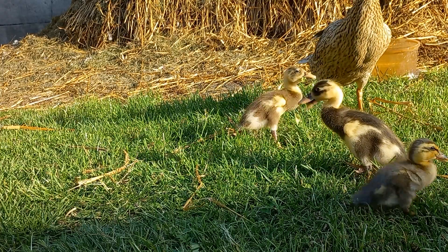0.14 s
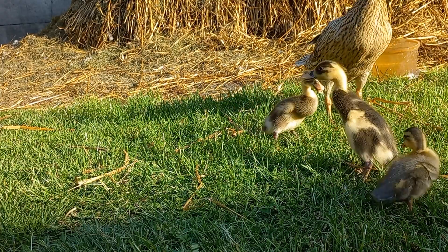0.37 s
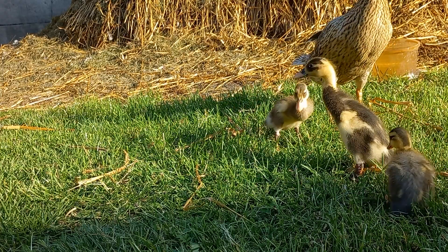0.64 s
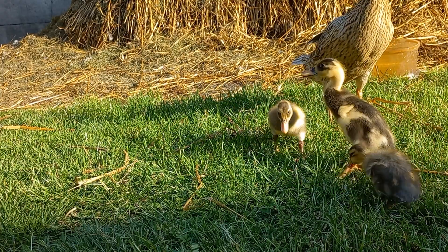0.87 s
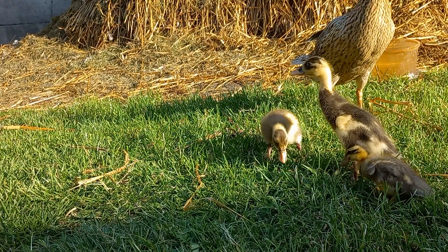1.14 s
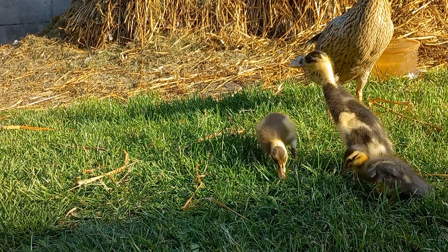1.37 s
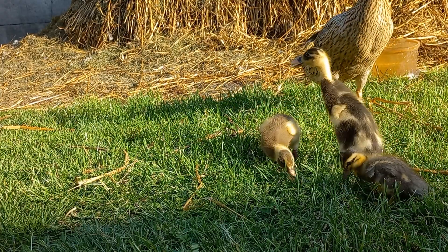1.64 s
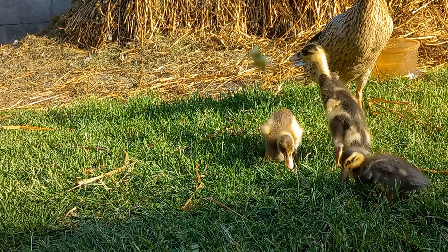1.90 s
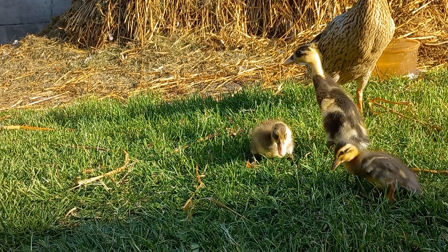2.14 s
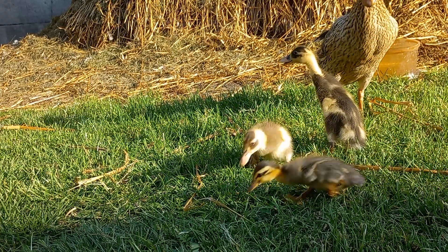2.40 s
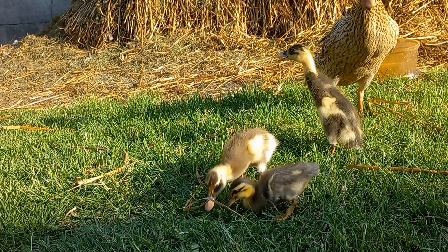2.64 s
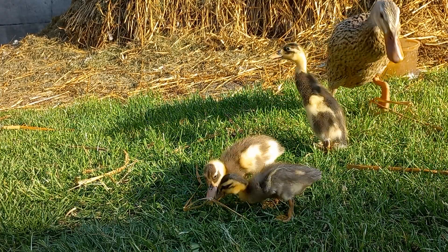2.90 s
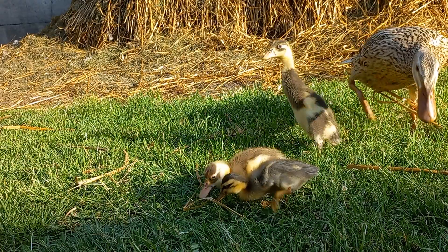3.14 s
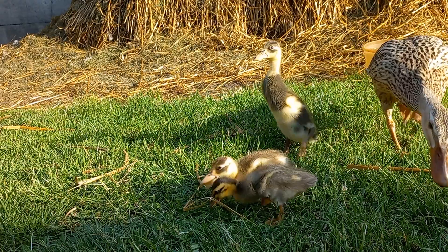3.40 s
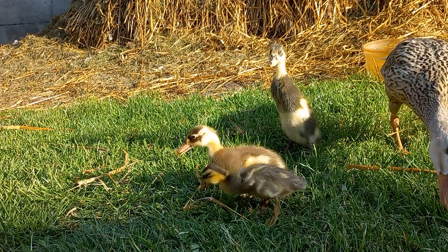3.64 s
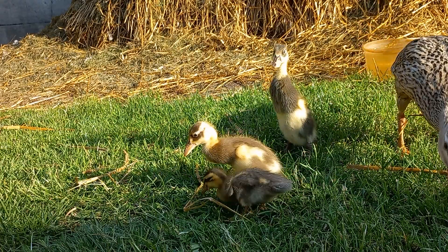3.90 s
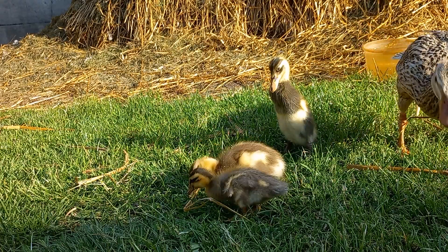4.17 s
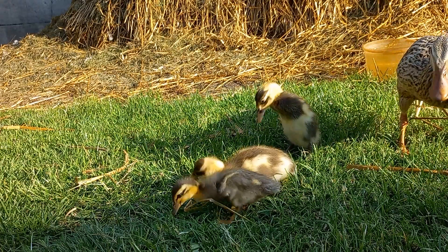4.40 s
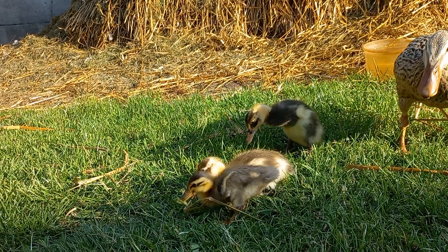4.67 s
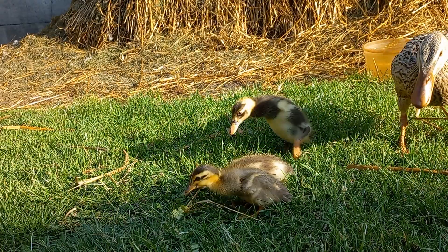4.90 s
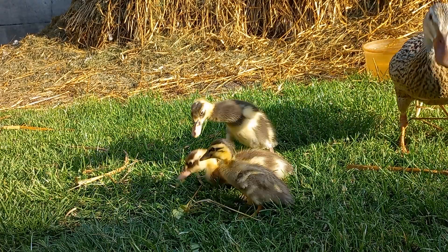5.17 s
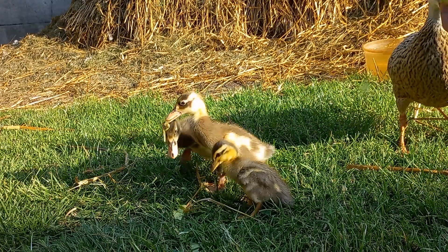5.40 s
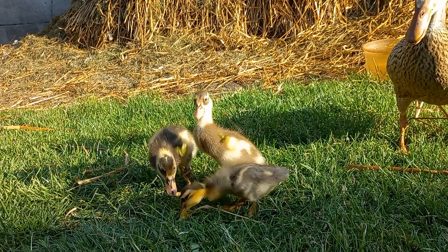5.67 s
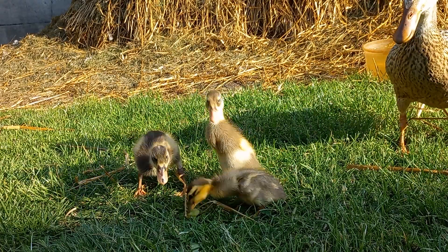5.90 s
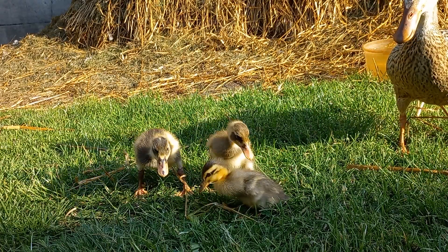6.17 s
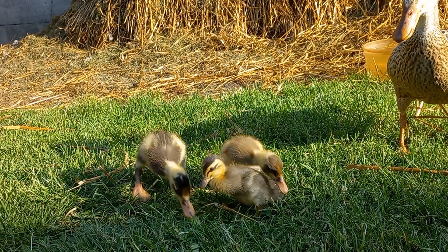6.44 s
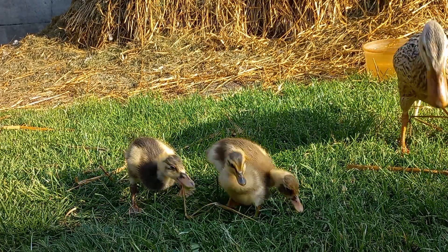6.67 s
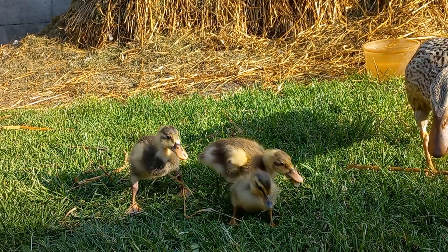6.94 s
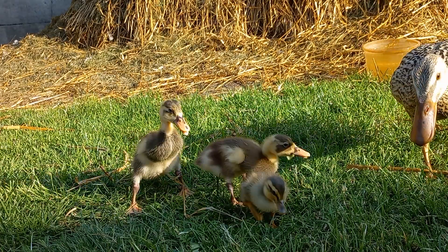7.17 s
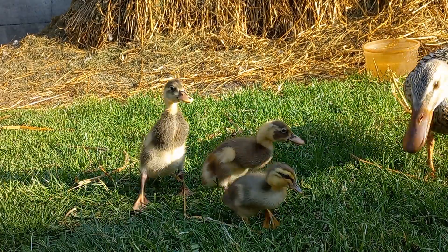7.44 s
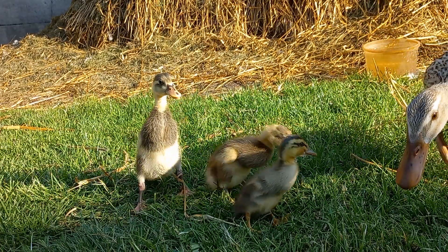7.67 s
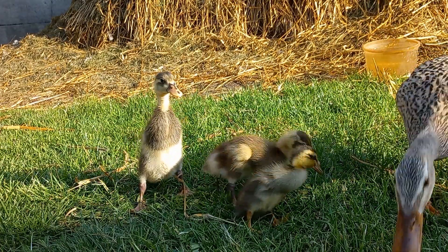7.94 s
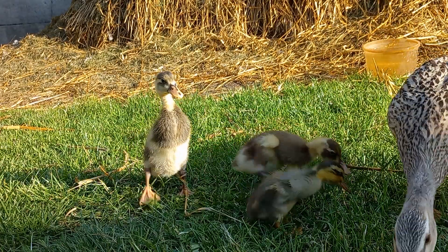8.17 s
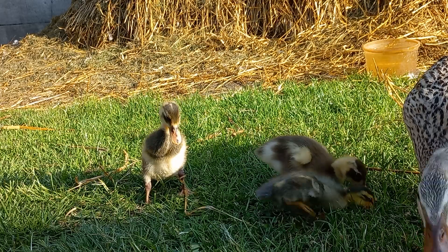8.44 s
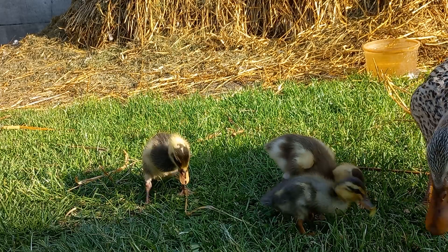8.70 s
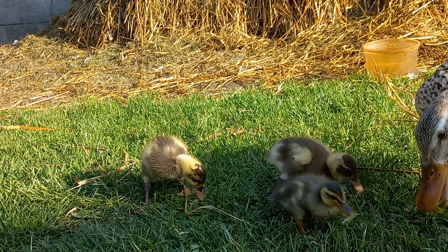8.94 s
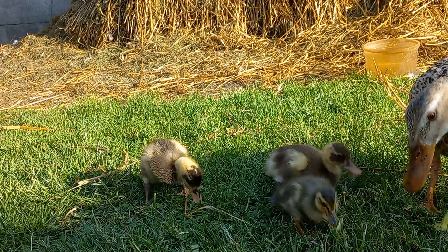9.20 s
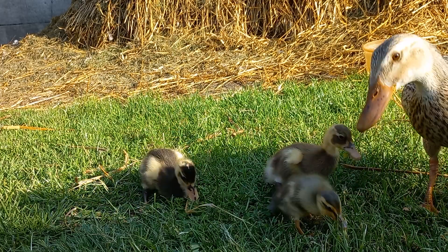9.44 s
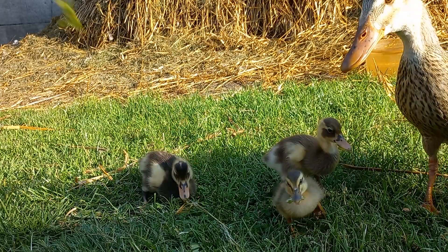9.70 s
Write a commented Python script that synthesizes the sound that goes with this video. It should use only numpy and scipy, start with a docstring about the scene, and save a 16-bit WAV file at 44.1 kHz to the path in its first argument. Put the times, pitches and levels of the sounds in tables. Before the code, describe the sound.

Outdoors on grass, a hen duck quacks sharply and clucks softly, ducklings peep thinly, faint birds whistle far away and low wind bumps the microphone.

```python
"""Duck and ducklings on a lawn

A mother duck gives five loud quacks and many soft clucks: quacks are beats ringing in a throat, clucks two
voices with sum and difference tones. Ducklings peep as arched sines and rustle the grass, a noise crackle.
Far birds whistle as gliding sines; a straw stack and fences answer with decaying noise echoes.
Light wind rumbles and bumps, mostly at one microphone port at a time, over a distant noise wash."""
import sys
import numpy as np
from scipy import signal
from scipy.fft import rfft, irfft, next_fast_len
from scipy.io import wavfile
from scipy.ndimage import uniform_filter1d, map_coordinates

SR = 44100
rng = np.random.default_rng(int(sys.argv[2]) if len(sys.argv) > 2 else 0)


def transcribe(u):
    """Save the signal u as a 16-bit wav file named by the first command-line argument.

    u: samples, shape (n,) or (channels, n), limited to [-1, 1]; the rate is SR.
    q: integer samples, one column per channel.
    """
    v = np.clip(np.atleast_2d(u).T, -1, 1)
    q = np.round(v * 32767).astype(np.int16)
    wavfile.write(sys.argv[1], SR, q)


def volts_from_decibels(level):
    """Turn decibel levels (scalar or array-like) into linear amplitude factors."""
    exponent = np.asarray(level, float) / 20
    return 10 ** exponent


N = 433062

# three chest modes, then three upper windpipe modes: centre_hz, width_hz, relative_db
PIPE_MODES = [(204, 82, -1), (460.3, 330, -9.5), (930, 46, -5.5), (3720, 632, -15.5), (5480, 790, -21),
              (7230, 370, -29.5)]
# mouth modes of a softer, half-shut bill: ratio to mouth resonance, width_hz, relative_db
HALF_SHUT_MODES = [(0.999, 236, 2.5), (1.602, 347, -7), (2.1, 300, -6)]
CREAK_S = 0.009  # span of the slow beats in a pop; the voice follows


def unit(x):
    """Scales to rms 1."""
    return x / np.sqrt(np.mean(x ** 2) + 1e-20)


def along(points, hz):
    """Interpolates (Hz, value) points on a log frequency axis."""
    f, v = np.transpose(points)
    return np.interp(np.log(hz + 1), np.log(f + 1), v)


def wobble(rate, size=N):
    """A smooth random curve, rate knots a second."""
    knots = rng.standard_normal(int(size * rate / SR) + 4)
    return map_coordinates(knots, [np.arange(size) * rate / SR])


def filtered(x, response):
    """Multiplies the spectrum by a complex response of frequency."""
    m = next_fast_len(N + SR // 4)
    return irfft(rfft(x, m) * response(np.fft.rfftfreq(m, 1 / SR)), m)[..., :N]


def hiss(spectrum, alike):
    """Stereo noise of rms 1; alike = power share common to both ports."""
    common, left, right = rng.standard_normal((3, N))
    alike = np.clip(alike, 0, 1)
    pair = np.sqrt(alike) * common + np.sqrt(1 - alike) * np.array([left, right])
    return unit(filtered(pair, lambda hz: volts_from_decibels(along(spectrum, hz))))


def add(track, s, sound):
    """Mixes a sound in at s seconds."""
    part = track[..., round(s * SR):][..., :sound.shape[-1]]
    part += sound[..., :part.shape[-1]]


def air():
    """Distant wash of fields and traffic, shaped noise, with two faint drones of band noise."""
    # wash spectrum: freq_hz, relative density_db
    wash = [(30, -57.5), (59, -21.5), (100, -10), (219, -12), (854, -25.5), (1200, -29), (1910, -23.5),
            (3500, -36), (7000, -31), (16000, -39.5)]
    # drones: centre_hz, half_width_hz, level_db
    drones = [(220, 210, -73.5), (1600, 18, -92.5)]
    sway_db = 0.9 * wobble(1.2) + 1.5 * wobble(7)
    out = volts_from_decibels(-71 + sway_db) * hiss(wash, alike=0.25)
    for hz, half_width_hz, db in drones:
        band = lambda f: 1 / (1 + ((f - hz) / half_width_hz) ** 2)
        tone = unit(filtered(rng.standard_normal(N), band))
        out += volts_from_decibels(db + 2 * wobble(5)) * tone
    return out


def wind():
    """Low noise rumble with lumps on each port, and bumps that strike mostly one port."""
    # rumble strength: time_s, level_db
    strength = [(0.0, -78.5), (3.06, -80), (3.47, -59), (4.07, -74.5), (4.38, -63), (5.47, -71),
                (7.109, -82), (7.3, -61.5), (8.78, -65.5), (9.82, -72.5)]
    # bumps: time_s, peak_db, left_minus_right_db
    bumps = [(0.775, -52.5, 30), (3.307, -49, -24), (3.577, -52, -31), (4.136, -44.5, -41),
             (4.45, -56.5, -30), (7.132, -40, -33), (7.352, -41.5, -8), (8.18, -45.5, -46),
             (8.697, -44.5, -7.5), (8.894, -46.5, -41.5)]
    # rumble spectrum: freq_hz, relative density_db
    gust = [(30, -57.5), (48, -26.5), (80, -1.5), (120, -11), (200, -15.5), (400, -55)]
    rumble_db = np.interp(np.arange(N) / SR, *np.transpose(strength))
    lumps = volts_from_decibels(rumble_db + 5.6 * np.array([wobble(12.0), wobble(34.0)]))
    t = np.arange(SR // 5) / SR
    for s, db, pan_db in bumps:
        side = volts_from_decibels(np.minimum([[pan_db], [-pan_db]], 0))
        bump = volts_from_decibels(db - 60 * t / 0.5) * (1 - np.exp(-t / 0.0041))
        add(lumps, s - 0.01, side * bump)
    return lumps * hiss(gust, alike=0.4)


def yard(x, gap_s):
    """Scattered answers of stack and fences, reshuffled by moving air; each frequency dies at its own speed."""
    # decay: freq_hz, t60_s
    decay = [(200, 0.27), (1500, 0.19), (4500, 0.16), (12000, 0.038)]
    out = 0
    drift = np.exp(3 * np.array([wobble(45) for _ in range(3)]))
    for share in np.sqrt(drift / drift.sum(0)):
        hz, t, z = signal.stft(rng.standard_normal((2, SR // 2)), SR, nperseg=256)
        fall = volts_from_decibels(-60 * t / along(decay, hz)[:, None])
        tail = signal.istft(z * fall, SR, nperseg=256)[1]
        late = np.pad(x * share, (round(gap_s * SR), 0))[None]
        out = out + signal.fftconvolve(late, tail / np.linalg.norm(tail[0]), axes=1)[:, :N]
    return out


def whistle(length_s, swoop_s, from_hz, to_hz, db, loss_db, flutter_db):
    """A gliding sine whose strength flutters on the way through the air."""
    t = np.arange(0, length_s, 1 / SR)
    flutter = wobble(60, size=SR)[:len(t)]
    level = volts_from_decibels(db - loss_db * t / length_s + flutter_db * flutter)
    level = signal.windows.tukey(len(t), 0.35) * level
    hz = to_hz + (from_hz - to_hz) * np.clip(1 - t / swoop_s, 0, 1) ** 0.92
    return level * np.sin(2 * np.pi * np.cumsum(hz) / SR)


def far_birds():
    """Whistles that glide onto a held note and one low falling moan from beyond the lawn."""
    # whistles: start_s, length_s, swoop_s, from_hz, held_hz, source level_db
    whistles = [(0.105, 0.081, 0.0186, 2180, 2450, -60), (1.028, 0.082, 0.041, 2927, 1896, -72),
                (1.095, 0.051, 0.023, 1870, 2295, -69), (4.041, 0.091, 0.081, 2560, 1620, -59),
                (4.069, 0.092, 0.024, 3256, 2240, -60.5), (4.351, 0.151, 0.047, 2660, 2075, -67.5),
                (4.654, 0.144, 0.016, 3150, 2448, -53.5), (5.3, 0.096, 0.067, 1838, 1660, -69),
                (5.793, 0.11, 0.036, 3170, 2704, -64.5), (6.818, 0.11, 0.044, 3215, 2000, -68)]
    out = np.zeros(N)
    for s, *row in whistles:
        add(out, s, whistle(*row, loss_db=12, flutter_db=2.5))
    moan = whistle(0.5, 0.5, from_hz=540, to_hz=440, db=-70, loss_db=0, flutter_db=2.5)
    add(out, 8.15, moan)
    return out


def grass():
    """Feet and bills stir dry stalks: swells of fine noise crackle plus single snaps and faint ticks."""
    # stirrings: centre_s, half_length_s, level_db
    stirrings = [(0.984, 0.091, -64), (2.989, 0.053, -56.5), (3.577, 0.21, -65.5), (4.53, 0.1, -60),
                 (8.08, 0.058, -67.5)]
    # snaps: time_s, peak_db
    snaps = [(0.9741, -42), (1.2954, -52.5), (4.4597, -43.5), (4.498, -56.5), (4.5301, -35.5), (4.571, -33)]
    # stalk spectrum: freq_hz, relative density_db
    stalks = [(3000, -28), (5000, -9), (8000, -5), (16000, 0)]
    ticks_per_s = 9
    crackle = unit(volts_from_decibels(5 * np.abs(wobble(400))) * hiss(stalks, alike=0.1))
    time_s = np.arange(N) / SR
    swell = sum(volts_from_decibels(db) * np.exp(-((time_s - s) / half) ** 2) for s, half, db in stirrings)
    blows, t = np.zeros(N), np.arange(600) / SR
    # random times, -72 to -58 dB
    ticks = rng.random((round(ticks_per_s * N / SR), 2)) * [N / SR, 14] - [0, 72]
    for s, db in [*snaps, *ticks]:
        add(blows, s, volts_from_decibels(db - 60 * t / 0.0042) * np.clip(t * 3000, 0, 1))
    return swell * volts_from_decibels(3.0 * wobble(50)) * crackle + blows * hiss(stalks, alike=0.092)


def ducklings():
    """Each peep is a short sine that arches up and down, with an overtone, weak in most."""
    # peeps: centre_s, top_hz, level_db
    peeps = [(2.432, 2950, -53.5), (2.566, 2370, -61.5), (3.075, 3060, -60), (3.592, 1970, -54),
             (3.62, 3090, -62), (3.758, 2393, -49.5), (3.898, 2948, -55), (4.149, 2140, -50.5),
             (4.315, 2505, -47), (4.522, 2540, -58), (5.86, 2200, -61), (5.966, 2410, -55.5),
             (6.47, 2216, -57), (6.9, 2420, -62), (6.952, 2540, -63.5), (7.138, 2800, -61.5),
             (7.707, 2800, -47), (7.96, 2990, -44.5), (8.127, 3430, -49), (8.345, 2150, -56),
             (8.487, 2580, -63), (8.51, 2060, -58)]
    strong_overtone_s = [3.075, 3.62, 7.136]
    out, u = np.zeros(N), np.linspace(-1, 1, 2300)
    for s, hz, db in peeps:
        phase = 2 * np.pi * np.cumsum(hz * (1 - 0.36 * u ** 2)) / SR
        strong = np.isclose(s, strong_overtone_s, atol=0.01).any()
        over_db = -5 if strong else -24.5
        tone = np.sin(phase) + volts_from_decibels(over_db) * np.sin(2 * phase)
        add(out, s - len(u) / 2 / SR, volts_from_decibels(db - 20 * u ** 2) * (1 - u ** 8) * tone)
    return out


def mode(f, c, w, db):
    """One causal resonance: centre c and width w in Hz."""
    return volts_from_decibels(db) * 1j * f * w / (c * c - f * f + 1j * f * w)


def throat(f, mouth_hz, modes, bill_hz, nasal_db, chest_db):
    """Mouth modes, upper band and chest; the bill darkens both sides of the mouth band."""
    nasal_hz, nasal_width_hz = 2100, 300
    out = sum((-1) ** k * mode(f, mouth_hz * r, w, g) for k, (r, w, g) in enumerate(modes))
    out = out * mode(f, mouth_hz * 1.042, bill_hz, 0)
    out = out + mode(f, nasal_hz, nasal_width_hz, nasal_db / 2) ** 2
    out = out / (1 + 1j * f / 2600 * 1.14 - (f / 2600) ** 2) ** 3
    chest = sum((-1) ** k * mode(f, c, w, g + chest_db) for k, (c, w, g) in enumerate(PIPE_MODES[:3]))
    return out + chest / (1 + 1j * f / 1500) ** 2


def windpipe(f):
    """The upper resonances, high-passed."""
    upper = sum((-1) ** k * mode(f, *row) for k, row in enumerate(PIPE_MODES[3:]))
    return upper * (1j * f / (3000 + 1j * f)) ** 4


def call(s, db, pitch_hz, mouth_hz, modes, bill_hz, half_beat, chest_db, jitter, scatter_db, nasal_db,
         breath_db):
    """Membrane beats, each ringing through the throat as it is shaped at that moment."""
    # beats where the voice catches: time_s, change_db
    catches = [(.394, -16), (.417, -16), (1.527, -8), (1.557, -9), (2.011, -12)]
    size = 10240
    t = np.arange(s[0], s[-1], 1 / SR)
    smooth_hz = uniform_filter1d(np.interp(t, s, pitch_hz), size=400)
    turns = np.cumsum(smooth_hz) / SR
    beat = np.arange(0, turns[-1], 0.5)
    chance = rng.standard_normal((len(beat), 3))
    when = np.interp(beat, turns, t)
    rate, effort_db = np.interp(when, s, pitch_hz), np.interp(when, s, db)
    half = np.interp(when, s, half_beat)
    catch_db = sum(d * np.exp(-((when - c) * rate * 1.5) ** 4) for c, d in catches)
    strength = volts_from_decibels(effort_db + catch_db + scatter_db * chance[:, 0])
    strength *= np.sqrt(SR / rate / (1 + half ** 2))
    strength[1::2] *= half[1::2]  # a weaker beat halfway through the cycle strengthens the even overtones

    f = np.fft.rfftfreq(size, 1 / SR)
    mouth = np.interp(when, s, mouth_hz)[:, None] * (1 + 0.012 * chance[:, 2:])
    nasal, chest = np.interp(when, s, nasal_db)[:, None], np.interp(when, s, chest_db)[:, None]
    ring = throat(f, mouth, modes, bill_hz, nasal, chest)
    ring /= np.sqrt(np.mean(np.abs(ring) ** 2, 1, keepdims=True))
    # harder beats are brighter
    treble = windpipe(f) / (1 + 1j * f / 9000) ** (effort_db[:, None] / -24) ** 2
    # each beat lets out a short hiss, strongest through the upper resonances
    puff = volts_from_decibels(breath_db - 60 * np.arange(400) / SR / 0.008) * rng.standard_normal((len(beat), 400))
    puff = rfft(puff, size)
    ring *= 1 + 0.09 * (f / 1500) ** 1.5 * puff / np.abs(puff).mean()  # upper overtones break up first
    treble_gain = volts_from_decibels(13.5 + 0.32 * (effort_db - effort_db.max()))[:, None]
    ring += treble_gain * treble * (1 + puff)
    delay_s = when - s[0] + 0.0024 + np.interp(when, s, jitter) * chance[:, 1] / rate
    delay = np.exp(-2j * np.pi * f * delay_s[:, None])
    return -irfft(np.sum(strength[:, None] * ring * delay, 0), size)


def pop(s0, db):
    """The shut bill opens on slow beats at 210 Hz."""
    same = np.ones(2)
    return call(s0 + np.array([0, CREAK_S]), [db, db - 7.5], 210 * same, 600 * same, HALF_SHUT_MODES,
                bill_hz=496, half_beat=0 * same, chest_db=8 * same, jitter=0 * same, scatter_db=0.51,
                nasal_db=-40 * same, breath_db=-16.5)


def cluck(s, db, low_hz, high_hz, high_db, mouth_hz):
    """Two membranes share one airstream: overtones mix into sum and difference tones, richer toward the end."""
    waver = 0.016  # pitch wander as a share
    soft_db, hard_db = -1.5, 2  # loss per overtone step, opening and end
    mix_db = 13, 1  # further loss of mixed tones, opening and end
    t = np.arange(s[0], s[-1], 1 / SR)
    u = (t - s[0]) / (s[-1] - s[0])
    hz = np.array([uniform_filter1d(np.interp(t, s, v), size=400) * (1 + waver * wobble(90, size=len(t)))
                   for v in (low_hz, high_hz)])
    orders = np.array([(m, n) for m in range(7) for n in range(-3, 5) if (m, n) > (0, 0)])
    f, phase = orders @ hz, 2 * np.pi * orders @ np.cumsum(hz, 1) / SR
    steps = np.abs(orders).sum(1)[:, None] - 1
    size = volts_from_decibels(high_db * (orders[:, 1:] != 0) - steps * (soft_db + (hard_db - soft_db) * u))
    size[orders.prod(1) != 0] *= volts_from_decibels(-np.interp(u, [0, 1], mix_db))

    closing_hz = mouth_hz * (hz[0] / hz[0].max()) ** 0.67
    nasal_db = 20 * np.log2(mouth_hz / 1400)  # a wider bill lets out more of the upper band
    ring = throat(np.abs(f), closing_hz, HALF_SHUT_MODES, 2300, nasal_db - 60 * (u - 0.65) ** 2,
                  -8 + 19 * u ** 2)
    size = size * (ring + volts_from_decibels(7.5) * windpipe(np.abs(f)))
    voice = np.real(size * np.exp(1j * np.sign(f) * phase)).sum(0)
    voice = voice / np.sqrt(np.sum(np.abs(size) ** 2, 0) / 2)
    breath = rfft(rng.standard_normal(len(t)) * np.abs(voice) * u)  # air escapes in step with the beats
    breath = irfft(breath * windpipe(np.fft.rfftfreq(len(t), 1 / SR)), len(t))
    voice = voice + volts_from_decibels(-23) * unit(breath)
    return voice * volts_from_decibels(np.interp(t, s, db)) * signal.windows.tukey(len(t), 0.14)


def clucks():
    """Soft clucks: a bill pop, then two voices that swell to a crest and sink in pitch."""
    # clucks: start_s, length_s, peak_db, low_top_hz, low_last_hz, high_top_hz, high_last_hz,
    # high_over_low_db, mouth_resonance_hz
    short_clucks = [(2.44, .079, -54, 716, 589, 1100, 879, -17.5, 1024),
                    (2.647, 0.079, -43, 830, 600, 1290, 900, 2.5, 1400),
                    (2.929, .097, -40.5, 902, 630.7, 1475, 950, 0, 1226),
                    (3.228, 0.089, -40, 862.7, 622.7, 1400, 796.5, -2, 950),
                    (3.444, 0.094, -32.5, 850, 723.5, 1320, 750.6, -2.5, 862),
                    (4.212, .09, -47.5, 849.4, 536, 1501, 830, -7, 824),
                    (4.722, 0.074, -45.5, 896.5, 748.3, 1324, 1130, -37, 1530),
                    (6.178, 0.066, -51.5, 810, 585, 1220, 891, -7.5, 1240),
                    (6.374, .069, -37, 823.7, 586.4, 1284, 843.7, 6, 1440),
                    (7.206, 0.056, -45, 761, 696, 1164, 1046, -16.5, 740),
                    (7.627, .091, -44.5, 886.3, 589.6, 1454, 930, -7.5, 1025),
                    (7.846, .09, -37, 884.4, 728.5, 1583, 680.7, -6, 1240),
                    (7.989, .06, -48.5, 956, 760, 1256, 1123, 2, 855),
                    (8.968, 0.083, -42.5, 907, 574, 1405, 887, -11, 893),
                    (9.274, .095, -44, 923.4, 600, 1502, 1031, -10, 1460)]
    # one drawn-out cluck that dips and ends on a yelp: time_s, level_db, low_voice_hz, high_voice_hz
    long_cluck = [(8.652, -45, 760.7, 1181), (8.667, -48.5, 900, 1388), (8.686, -44, 700, 1000),
                  (8.716, -42.5, 715, 965), (8.763, -35.5, 755, 1020), (8.776, -40.5, 786.4, 1139),
                  (8.788, -27, 653.5, 959.3), (8.8, -51, 563, 780)]
    voiced_s = 0.03  # pop to top pitch
    swell_db, fade_db, crest_share = 8, 2.5, 0.56
    low_sag_power, high_sag_power = 1.7, 1.6  # higher sinks later
    out, u = np.zeros(N), np.linspace(0, 1, 11)
    for s0, length, peak_db, low_hz, low_last_hz, high_hz, high_last_hz, high_db, mouth_hz in short_clucks:
        s = s0 + np.r_[CREAK_S, voiced_s + (length - voiced_s) * u]
        rise_db = np.interp(u, [0, crest_share, 1], [-swell_db, 0, -fade_db])
        db = peak_db + np.r_[-2 * swell_db, rise_db]
        low = np.r_[0.75 * low_hz, low_hz + (low_last_hz - low_hz) * u ** low_sag_power]
        high = np.r_[0.85 * high_hz, high_hz + (high_last_hz - high_hz) * u ** high_sag_power]
        add(out, s0 - 0.002, pop(s0, -47 + 0.64 * (peak_db + 42)))  # the pop partly follows the level
        add(out, s[0], cluck(s, db, low, high, high_db, mouth_hz))
    add(out, 8.638 - 0.002, pop(8.638, -42))
    add(out, long_cluck[0][0], cluck(*np.transpose(long_cluck), high_db=1.5, mouth_hz=950))
    return out


def quacks():
    """Loud quacks with the bill wide: the pitch lifts partway, the beats roughen, the pitch sinks back."""
    # quacks: start_s, length_s, peak_db, opening_hz, highest_hz, lift_share_of_length, lift_s,
    # mouth_resonance_hz, level_change_at_lift_db, chest_db
    loud_quacks = [(0.371, 0.12, -22.5, 175.3, 210.3, .4, 0.018, 1269, 1, -6.5),
                   (1.510, 0.1, -24.5, 177.1, 220, .3, .02, 1274, 3, -7),
                   (1.985, 0.11, -18, 203.9, 249.4, 0.42, 0.029, 1331, 2.5, -10),
                   (5.639, 0.0955, -17.5, 224.7, 246.3, 0.36, .02, 1373, -0.5, -6),
                   (7.265, 0.11, -18, 220.3, 314.4, .5, 0.01, 1486, -3, 0)]
    # wide-open mouth modes: ratio to mouth resonance, width_hz, relative_db
    wide_modes = [(1.0, 209.7, 0.5), (1.17, 297, 0), (1.5, 457, -7.5)]
    attack_s, release_s, peak_share = 0.0013, 0.026, 0.6
    envelope_db = [-10, -4.5, 0, -0.5, -9.5]  # first beat, attacked, peak, held, last beat
    sink_share, sink_s = 0.76, 0.03  # share of the lift given back at the end
    lead_s = 0.048
    out = np.zeros(N)
    for s0, length, peak_db, low_hz, high_hz, lift, lift_s, mouth, change_db, chest_db in loud_quacks:
        t = np.r_[-lead_s, -0.006, np.arange(0, length, 0.004)]  # a faint lead-in, then the call
        shape_s = [0, attack_s, peak_share * length, length - release_s, length]
        lifted = 1 / (1 + np.exp((lift * length - t) / lift_s * 2))
        db = peak_db + np.interp(t, shape_s, envelope_db) + change_db * lifted
        hz = low_hz + (high_hz - low_hz) * lifted
        hz -= sink_share * (high_hz - low_hz) * np.clip(1 + (t - length) / sink_s, 0, 1)
        db[:2], hz[:2] = (-70, -44), (1.1 * low_hz, 1.5 * low_hz)
        shut = np.clip(-t / lead_s, 0, 1)  # the bill opens through the lead-in
        quack = call(s0 + t, db, hz, mouth * (1 - 0.45 * shut), wide_modes, bill_hz=950,
                     half_beat=0.22 * lifted, chest_db=chest_db + 14 * shut, jitter=0.01 + 0.02 * lifted,
                     scatter_db=1.6, nasal_db=-22 + 0 * t, breath_db=-8.5)
        add(out, s0 + t[0] - 0.002, quack)
    return out


def scene():
    """The birds stand to the right of the microphone pair: the left port hears them later and duller."""
    # shading of the far port: freq_hz, left_minus_right_db
    shading = [(300, -.8), (4000, -2.8)]
    lag_samples = 5.13  # left after right

    def ports(hz):
        delay = np.exp(-1j * np.pi * hz * lag_samples / SR * np.array([[1], [-1]]))
        return delay * volts_from_decibels(along(shading, hz) * np.array([[0.5], [-0.5]]))

    near, far = clucks() + quacks() + ducklings(), far_birds()
    direct = filtered(near + volts_from_decibels(0.5) * far, ports)
    echoes = volts_from_decibels(-16.0) * yard(near, gap_s=0.0065) + volts_from_decibels(3) * yard(far, gap_s=0.008)
    return direct + echoes + volts_from_decibels([[-1.2], [1.2]]) * grass() + wind() + air()


def band_limit(x):
    """A steep low-pass at the top of the band."""
    return signal.sosfilt(signal.butter(12, 15900, fs=SR, output="sos"), x)


def record(dry):
    """Stores the finished stereo mix."""
    return band_limit(dry)


dry = scene()
out = record(dry)
transcribe(out)
```